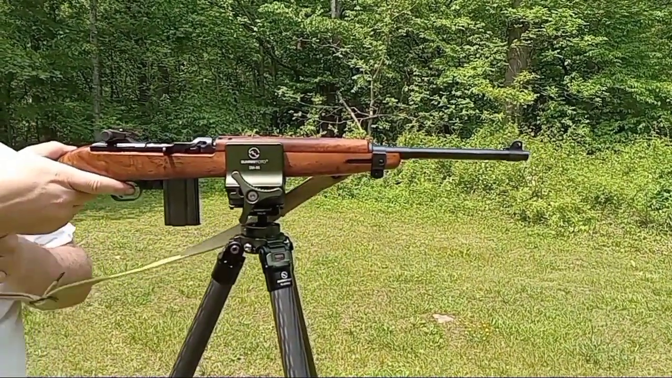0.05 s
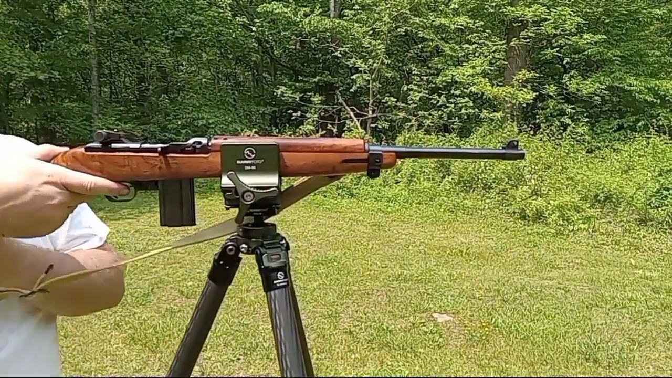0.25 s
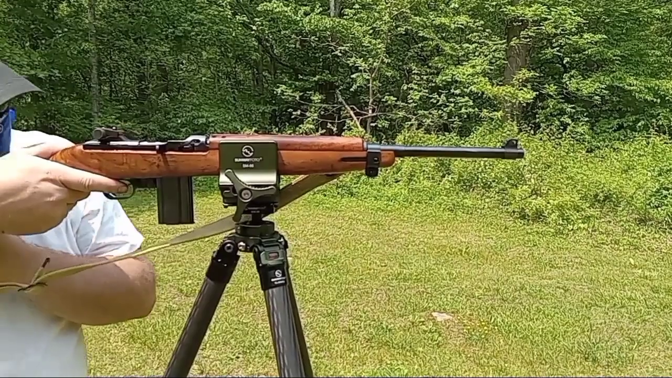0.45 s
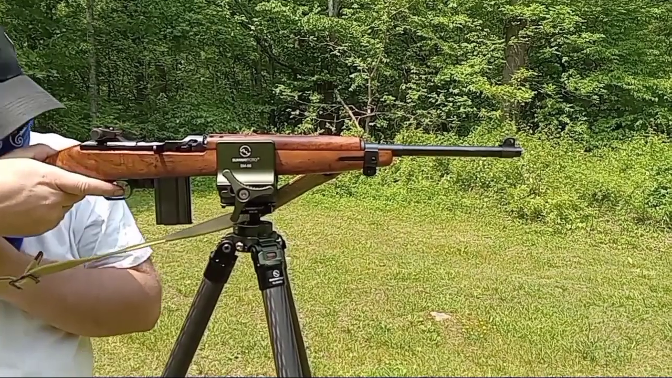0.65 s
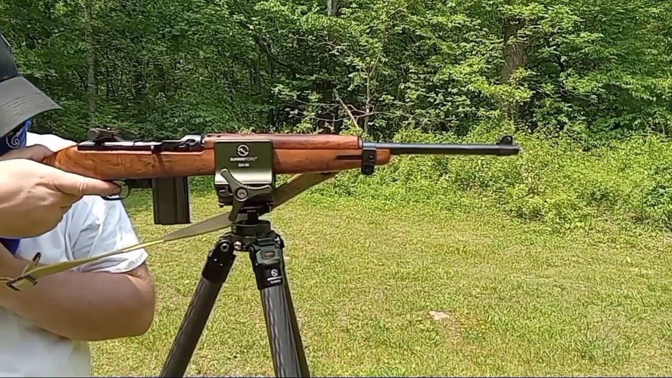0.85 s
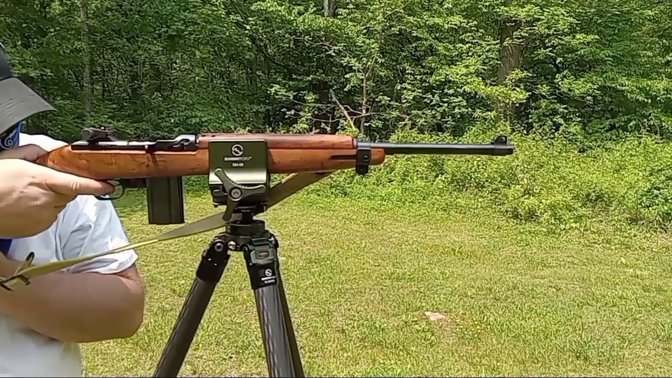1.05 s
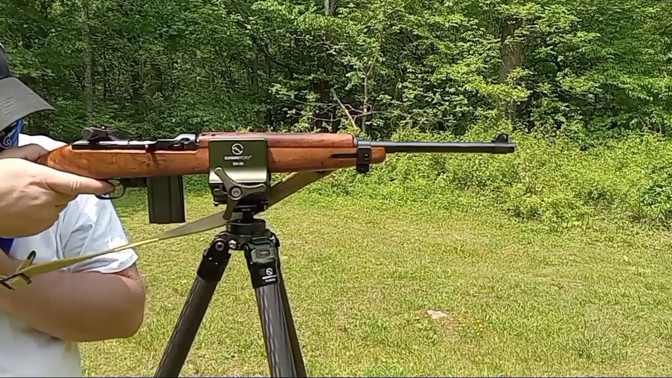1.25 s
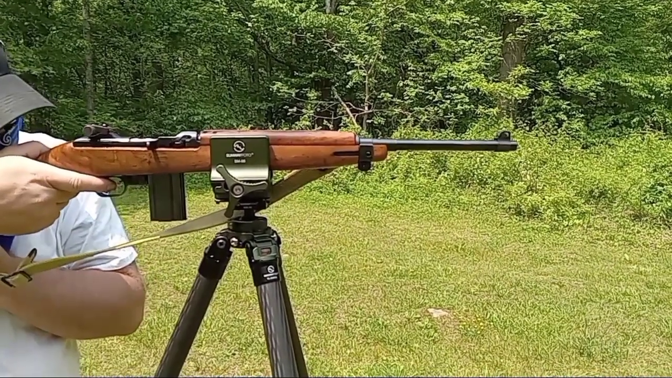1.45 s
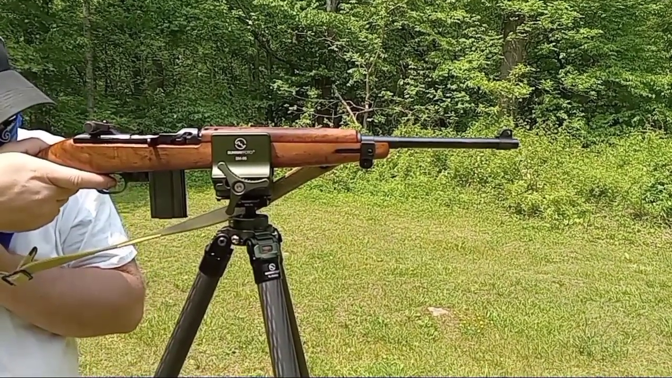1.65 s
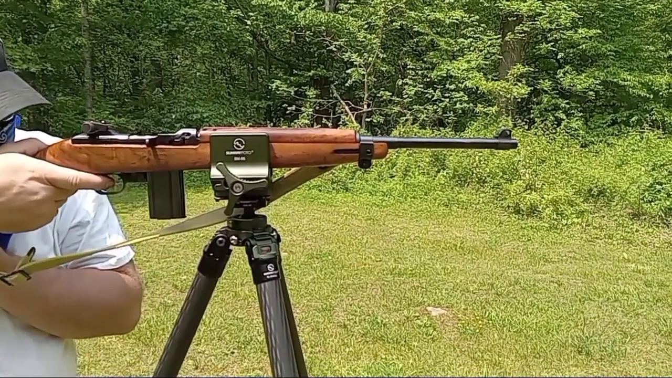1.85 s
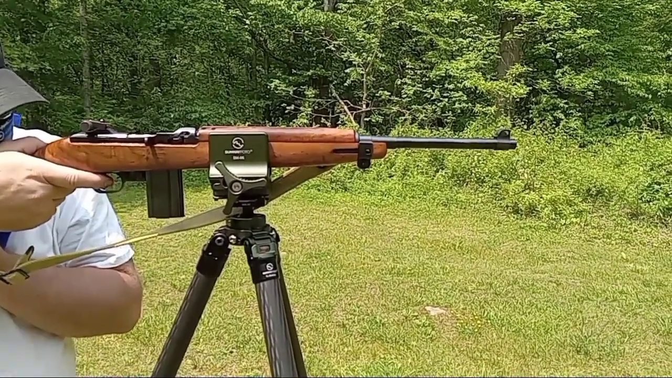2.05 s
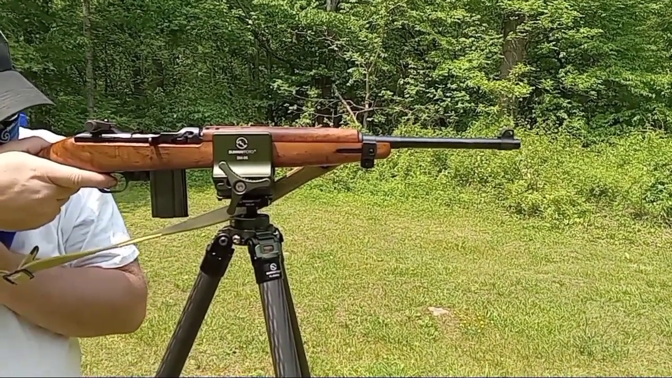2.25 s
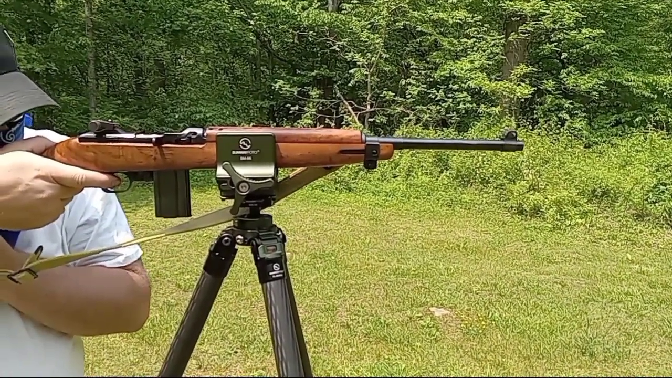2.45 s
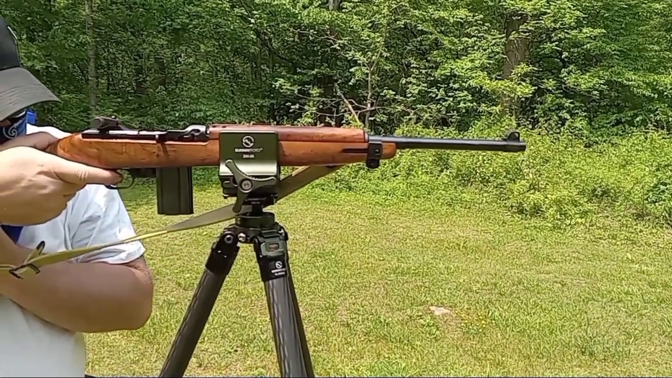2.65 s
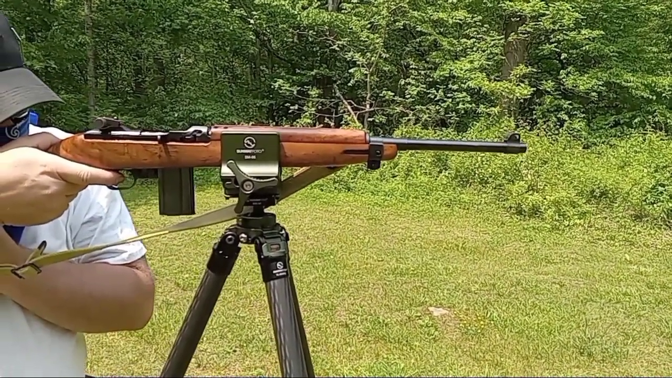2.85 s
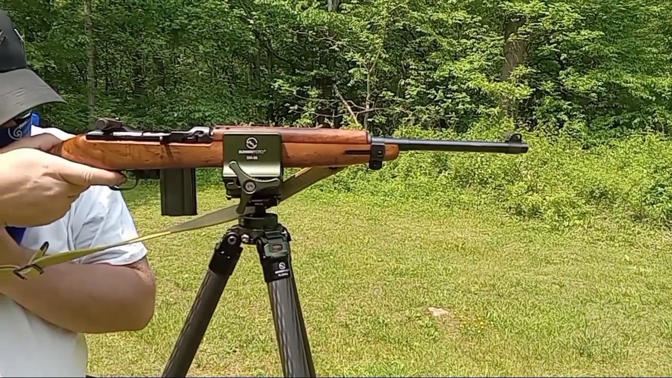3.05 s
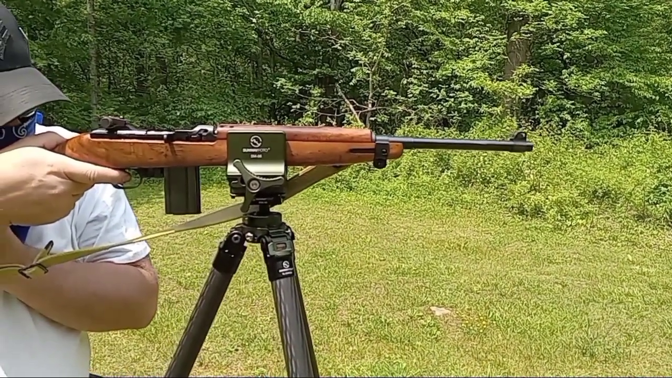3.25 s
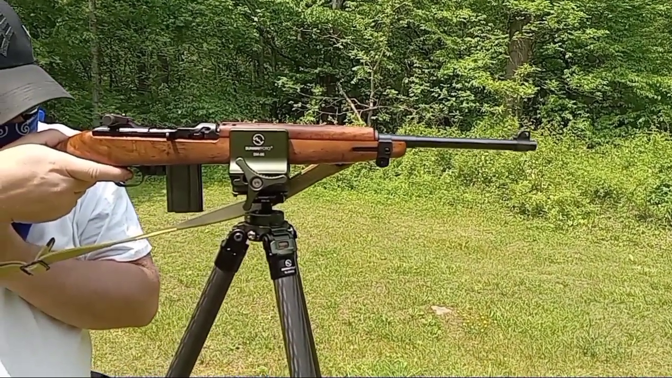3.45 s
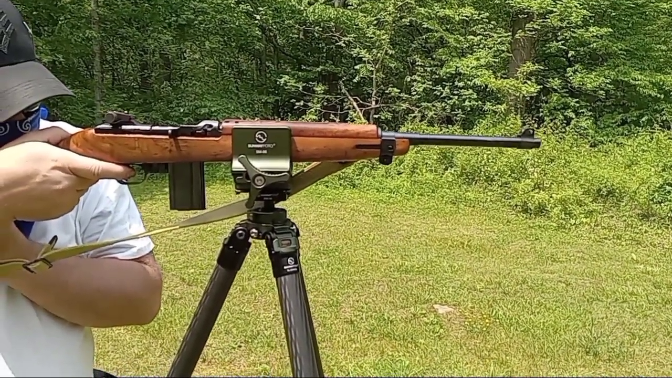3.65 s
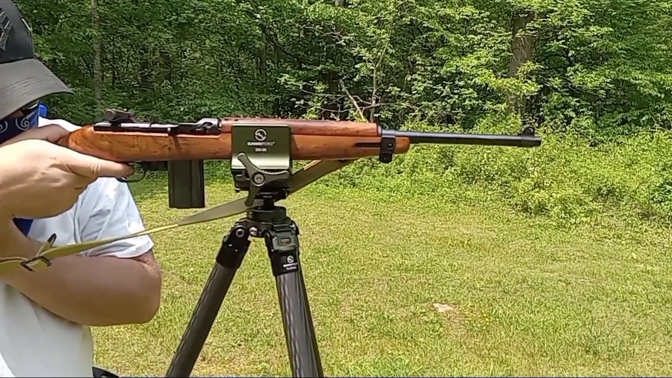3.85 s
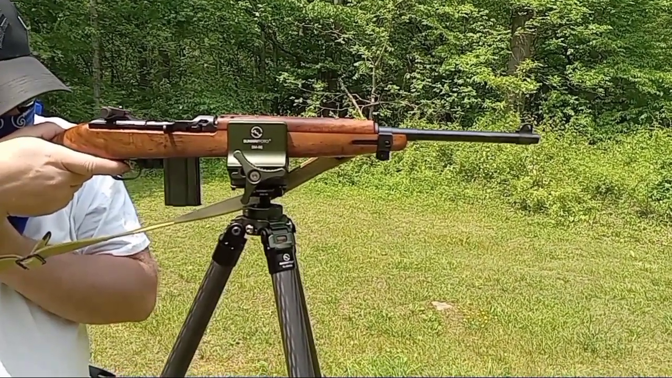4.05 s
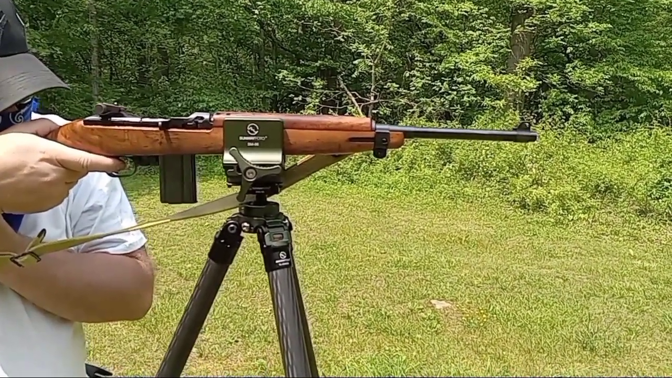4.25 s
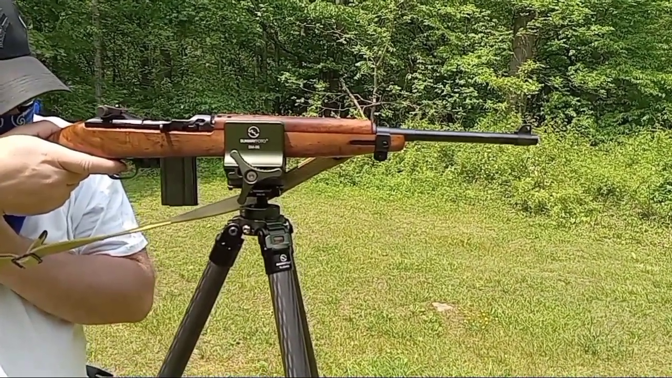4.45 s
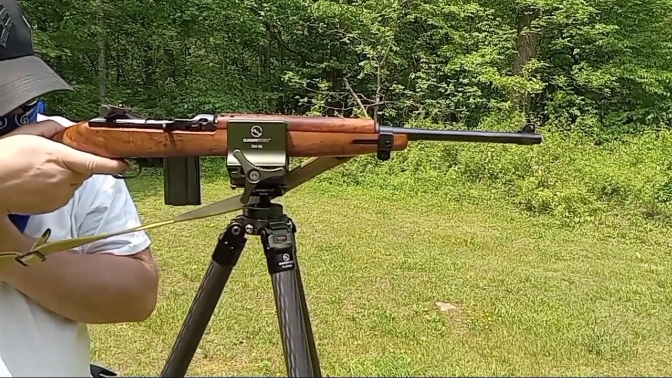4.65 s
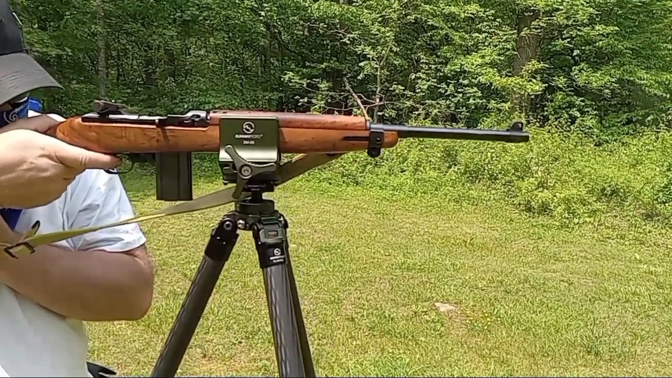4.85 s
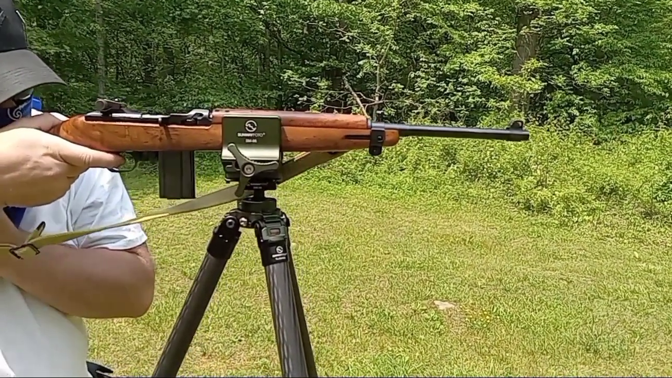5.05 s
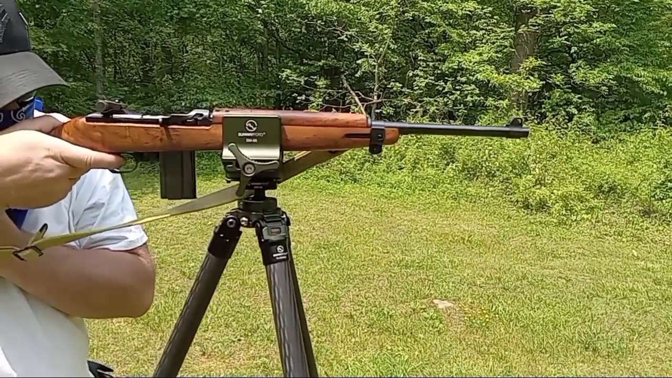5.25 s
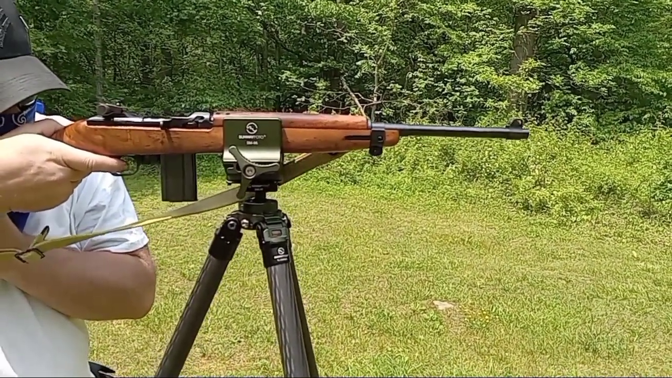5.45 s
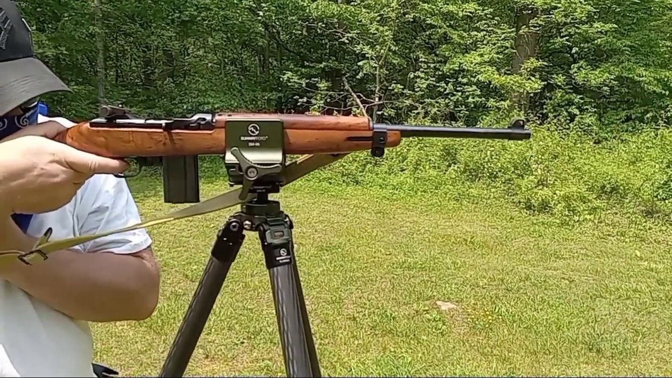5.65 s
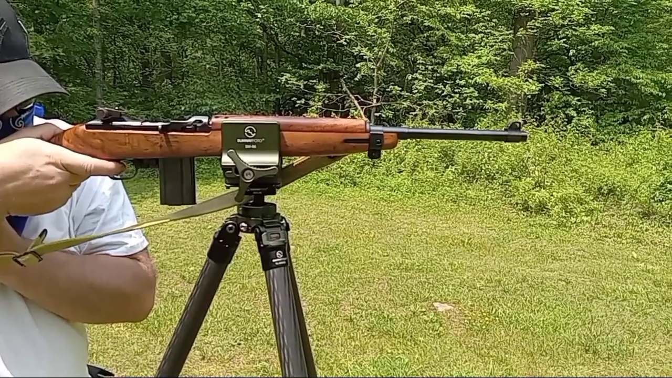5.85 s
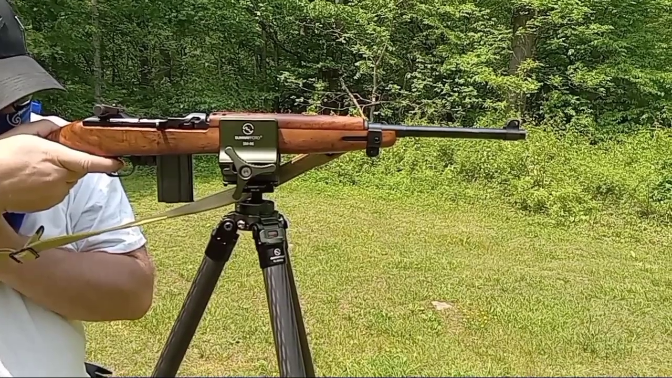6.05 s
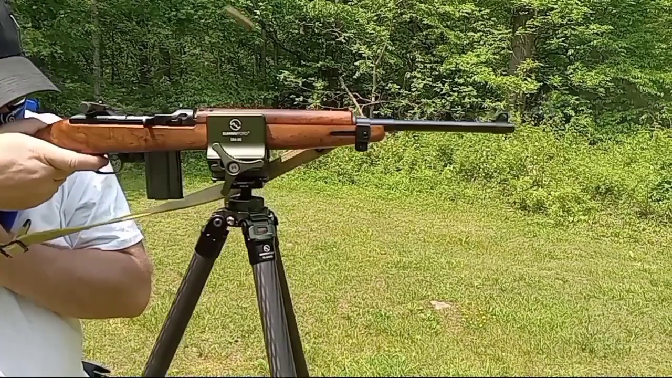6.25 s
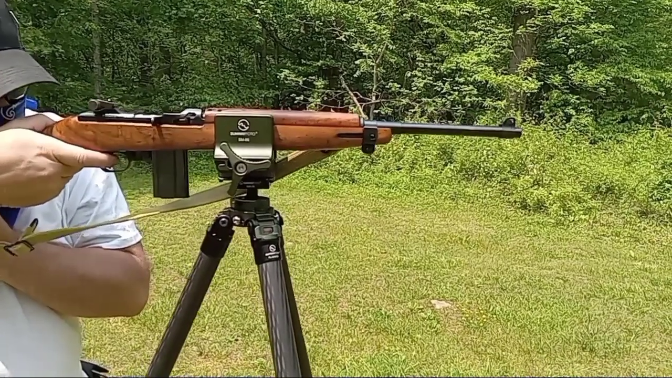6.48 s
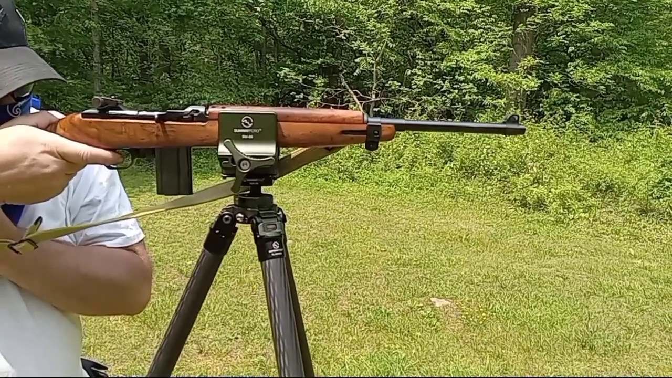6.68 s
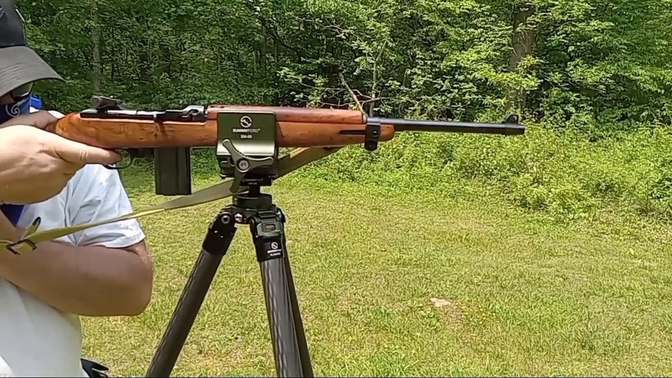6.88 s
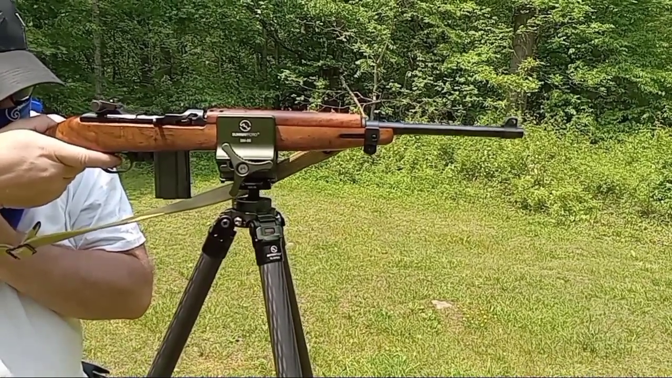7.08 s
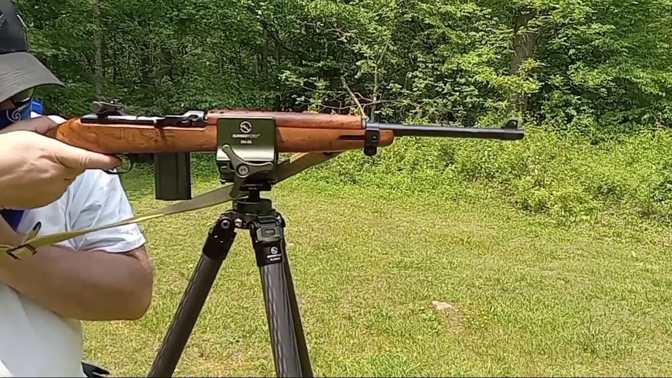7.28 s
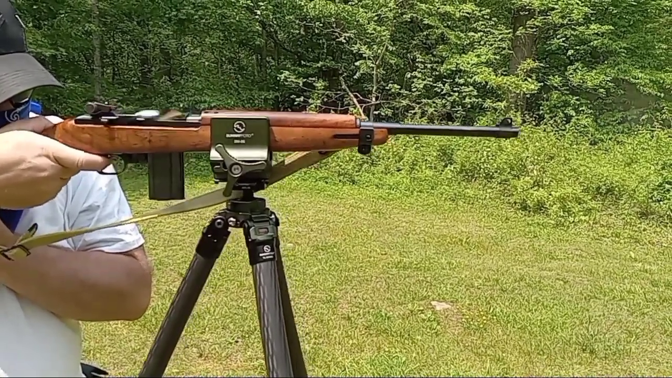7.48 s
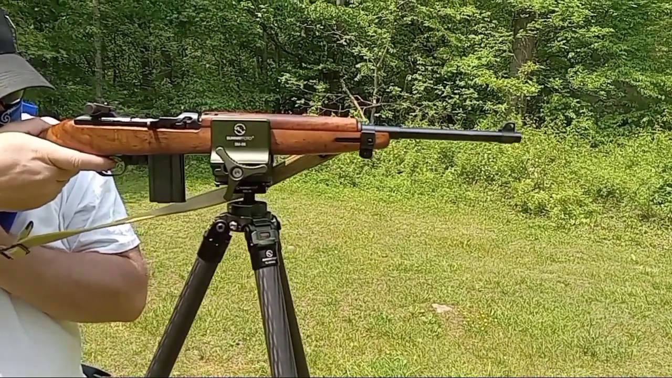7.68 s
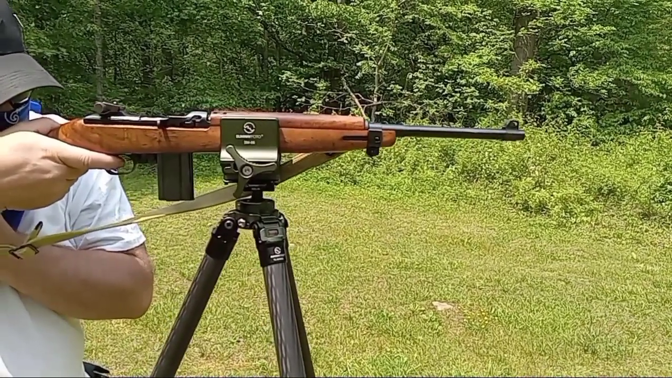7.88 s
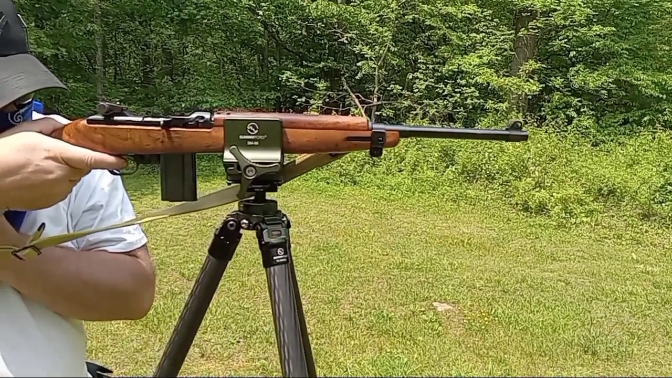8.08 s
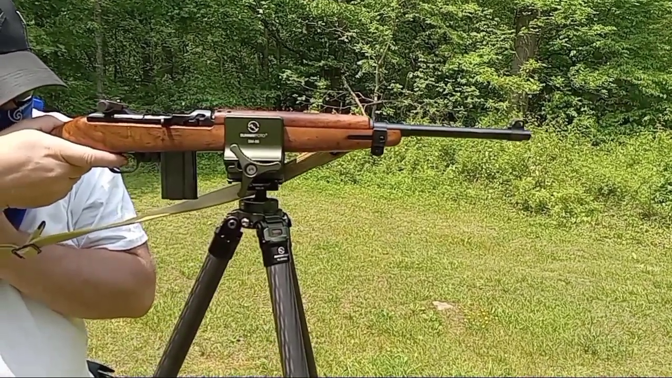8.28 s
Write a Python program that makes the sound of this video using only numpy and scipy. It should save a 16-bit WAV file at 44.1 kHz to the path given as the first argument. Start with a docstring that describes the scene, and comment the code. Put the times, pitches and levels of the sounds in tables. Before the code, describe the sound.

Very quiet opening: thin insect drone, far whistles and trills, uneven soft thuds of wind on the microphone, strongest around three and a half seconds. A carbine then fires three times at intervals of roughly a second and a half. Each blast is abrupt and clipped, followed by quick slap echoes, a short ring of the action and a wide hissing roll through the trees, darkening as it fades.

```python
"""A meadow ringed by woods: a carbine on a tripod fires three shots, a few metres from a small camera.
The hammer ticks (ringing modes plus scrape); the blast overloads the microphone (tanh); banks and trunks
throw it back as shaped noise bands and short slaps, the gun's action rings (short wavelets); a spent case
pings (decaying sines). Cicadas drone (flickering bands of hiss), birds whistle and trill far off (gliding,
warbled sines with a noise smear), puffs of wind thump on the microphone (low swings at uneven moments)."""
import sys
import numpy as np
from scipy import signal
from scipy.io import wavfile
from scipy.ndimage import uniform_filter1d

SR = 44100
rng = np.random.default_rng(int(sys.argv[2]) if len(sys.argv) > 2 else 0)


def persist_wave(psi):
    """Save psi, clipped to +-1, as 16-bit WAV."""
    counts = np.round(np.clip(psi, -1, 1) * 32767).astype(np.int16)
    wavfile.write(sys.argv[1], SR, np.atleast_2d(counts).T)


N = 366912

BANDS_HZ = 45 * 2 ** np.arange(0, 8.55, 1 / 3)  # third-octave centres of the echo roll


def undb(db):
    """Gain of a level in dB."""
    return 10 ** (np.asarray(db) / 20)


def band(x, hz, octaves=1 / 3):
    """Band-pass; unit white noise comes out at 0 dB per Hz."""
    edges_hz = np.minimum(hz * 2. ** np.array([-octaves / 2, octaves / 2]), .49 * SR)
    sos = signal.butter(2, edges_hz, "bandpass", fs=SR, output="sos")
    return signal.sosfilt(sos, x) * np.sqrt(SR / 2)


def walk(rate_hz, size=N):
    """Random levels held 1 / rate_hz and slewed by two moving averages."""
    k = int(SR / rate_hz)
    steps = np.repeat(rng.standard_normal(size // k + 1), k)
    return 1.3 * uniform_filter1d(uniform_filter1d(steps, k), k)[:size]


def add(out, s, x):
    """Mixes x into out from time s on."""
    i = int(s * SR)
    out[i:i + len(x)] += x[:len(out) - i]


def ring(modes, rise_s):
    """Struck metal: decaying sines of random phase behind a soft onset."""
    t = np.arange(SR // 5) / SR
    tone = 0
    for hz, db, t60_s in modes:
        tone = tone + undb(db - 60 * t / t60_s) * np.sin(2 * np.pi * (hz * t + rng.random()))
    return tone * (1 - np.exp(-t / rise_s))


def wavelet(s, hz, cycles, db):
    """Short pressure swing centred on time s, as (start s, samples)."""
    turns = np.arange(-2 * cycles, 2 * cycles, hz / SR)
    envelope = np.exp(-(2 * turns / cycles) ** 2)
    return s + turns[0] / hz, -undb(db) * envelope * np.sin(2 * np.pi * turns + 0.43)


def cicadas():
    """A far chorus: narrow bands of hiss, each flickering alone."""
    # spectrum before the whole is levelled: (frequency [Hz], relative density [dB per Hz])
    spectrum = [(82, -35), (140, -13), (393, -14.5), (1060, -10.5), (1370, 0), (2500, -8.5), (3210, -3.5),
                (4410, -17), (6430, -21.5), (8150, -29), (9750, -33), (11200, -44.5), (16000, -41.5)]
    level_db = -60
    hz_at, db_at = np.transpose(spectrum)
    out = 0
    for hz in 110 * 2 ** np.arange(0, 7.2, 1 / 5):
        db = np.interp(np.log(hz), np.log(hz_at), db_at) + 0.8 * walk(36)
        out = out + undb(db) * band(rng.standard_normal(N), hz, 1 / 5)
    return out / out.std() * undb(level_db)


def birds():
    """Gliding whistles, roughened by a fast warble, smeared by the woods."""
    # calls: (start [s], end [s], start frequency [Hz], end frequency [Hz], level [dB], buzz [0-1])
    calls = [(0.039, 0.135, 3460, 3425, -60, 0.3), (0.097, 0.143, 3680, 3710, -57, 0.2),
             (.71, 0.738, 2820, 2820, -64, 0.1), (0.763, 0.814, 2500, 2700, -64, 0.05),
             (0.867, 0.932, 3300, 3270, -61, 0.25), (1.387, 1.422, 2901, 2950, -64, 0.16),
             (1.4, 1.486, 5800, 5800, -77, 0.07), (1.583, 1.69, 4930, 4920, -72, 0),
             (1.67, 1.771, 3780, 3802, -67, 0), (1.71, 1.86, 5330, 5400, -74.5, 0),
             (1.91, 1.98, 4740, 4720, -70, 0.1), (1.924, 1.985, 3110, 2940, -61, 0.44),
             (2.02, 2.175, 5250, 5360, -62, 0.1), (2.126, 2.164, 2930, 3080, -57.5, 0.15),
             (2.153, 2.214, 4860, 3420, -65.5, 0.05), (2.31, 2.367, 4230, 4800, -68, 0.03),
             (2.362, 2.4, 4810, 4860, -62.5, 0.03), (2.442, 2.547, 4700, 2700, -62, 0.07),
             (2.478, 2.545, 3850, 3570, -63.5, 0.03), (2.6, 2.648, 3763, 5200, -66, 0.05),
             (2.634, 2.687, 5320, 5070, -65, 0.2), (2.662, 2.739, 4500, 2950, -58.5, 0.17),
             (2.672, 2.72, 4600, 4630, -69, .03), (2.833, 2.919, 4460, 2720, -57, 0.08),
             (2.848, 2.906, 4800, 4710, -68, 0.1), (2.91, 2.959, 3220, 5370, -65, 0.05),
             (3.046, 3.128, 4570, 4580, -59.5, 0.1), (3.145, 3.325, 3900, 3780, -58, 0.25),
             (3.192, 3.26, 4390, 3390, -57, 0.13), (3.302, 3.36, 4470, 4450, -54.5, 0.04),
             (3.297, 3.331, 2758, 3440, -53, 0.1), (3.396, 3.517, 5580, 5480, -62, 0.8),
             (3.443, 3.509, 6000, 7390, -69, 0.4), (3.53, 3.675, 5680, 5630, -67.5, .4),
             (3.549, 3.622, 4920, 3300, -58.5, 0.05), (3.585, 3.644, 3980, 3830, -59.5, 0.13),
             (4.287, 4.357, 2950, 2867, -59.5, 0.46), (4.462, 4.493, 5605, 5450, -60.5, 0.07)]
    warble_hz, smear_t60_s, smear_db = 393, 0.5, -1.5
    out = np.zeros(N)
    for start, end, from_hz, to_hz, db, buzz in calls:
        u = np.linspace(0, 1, int((end - start) * SR))
        glide_hz = from_hz * (to_hz / from_hz) ** u ** 0.92
        jitter = (.009 + .012 * buzz) * walk(700, len(u))
        warble = .11 * buzz * np.sin(2 * np.pi * warble_hz * (end - start) * u)
        hz = glide_hz * (1 + jitter + warble)
        swell = undb(db + 3.2 * walk(90, len(u))) * np.sin(np.pi * u) ** (0.58 - 0.5 * buzz)
        add(out, start, np.sqrt(2) * swell * np.sin(2 * np.pi * np.cumsum(hz) / SR))
    t = np.arange(SR // 2) / SR
    smear = rng.standard_normal(len(t)) * undb(-60 * t / smear_t60_s)
    smear = smear / np.sqrt(np.sum(smear ** 2))
    return out + undb(smear_db) * signal.fftconvolve(out, smear)[:N]


def wind_push():
    """Strength of the wind: a faint floor, spells of breeze, puffs strongest towards the front."""
    # spells of light wind: (start [s], end [s], level [dB])
    breeze = [(0, 0.375, -72), (0.747, 1.802, -73), (2.124, 2.461, -65.5), (2.665, 3.118, -69.5),
              (3.37, 3.935, -61.5), (4.064, 4.606, -64), (6.516, 6.987, -53)]
    # puffs: (start [s], level [dB], length [s], stretched to 0.02 if shorter)
    puffs = [(0.327, -44, 0.051), (1.136, -33.5, 0.082), (1.48, -49, 0.1), (1.581, -39, 0.0617),
             (1.643, -39, 0.0543), (1.718, -48, 0.0975), (2.161, -48.5, 0.0315), (2.893, -45, 0.025),
             (3.054, -35.5, 0.0916), (3.357, -40.5, 0.053), (3.543, -23, 0.079), (3.669, -33, 0.099),
             (4.089, -47, 0.0185), (4.314, -38, 0.022)]
    push = undb(-78.0 + 5.9 * walk(28))  # the air is never quite still
    for start, end, db in breeze:
        add(push, start, undb(db + 3.49 * walk(21.81, int((end - start) * SR))))
    for s, db, length_s in puffs:
        u = np.linspace(0, 1, int(max(length_s, .02) * SR))
        add(push, s, undb(db - 16.0 * u) * np.sin(np.pi * u) ** 0.74)
    return push


def wind():
    """Eddies knock the membrane at uneven moments: band-passed impulses of alternating sign."""
    push = wind_push()
    count = N // 200
    when = np.cumsum(rng.uniform(0.0035, 0.01, count) * SR).astype(int)
    size = (-1.) ** np.arange(count) * undb(4 * rng.standard_normal(count))
    eddies = np.zeros(N)
    eddies[when[when < N]] = size[when < N]
    eddies = signal.sosfilt(signal.butter(2, [50, 140], "bandpass", fs=SR, output="sos"), eddies)
    return signal.sosfilt(signal.butter(5, 200, fs=SR, output="sos"), push * eddies / eddies.std())


def spent_case():
    """One case pings on something hard: two decaying modes."""
    # modes: (frequency [Hz], level [dB], t60 [s])
    case_modes = [(10750, -48, 0.088), (15750, -63, .06)]
    out = np.zeros(N)
    add(out, 5.287, ring(case_modes, rise_s=0.00103))
    return out


def late_echoes():
    """Details late in the rolls: narrow noise swells, and lone trunks answering sharply in the last one."""
    # swells, low booms and bright patches: (start [s], centre [Hz], length [s], level [dB])
    booms = [(4.96, 1900, .12, -32), (5.138, 1400, 0.064, -29.5), (5.245, 465, 0.054, -35),
             (5.347, 630, 0.062, -38), (5.477, 419, 0.08, -42), (5.593, 413, 0.061, -39.5),
             (6.355, 2360, 0.097, -26.5), (6.714, 410, 0.0615, -39), (7.693, 2070, .11, -29.5),
             (7.832, 2830, 0.052, -27)]
    # lone trunks: (time [s], level [dB])
    cracks = [(7.729, -8), (7.764, -8), (7.817, -12)]
    out = np.zeros(N)
    for s, hz, length_s, db in booms:
        rumble = band(rng.standard_normal(SR // 4), hz, 0.28)[-int(length_s * SR):]
        add(out, s, undb(db) * rumble / rumble.std() * np.sin(np.linspace(0, np.pi, len(rumble))))
    for s, db in cracks:
        add(out, *wavelet(s, 2434, 1.713, db))
    return out


def hammer(db):
    """Hammer tick: ringing modes with a rough level, plus a short scrape of differenced noise."""
    # modes: (frequency [Hz], relative level [dB], t60 [s])
    hammer_modes = [(6450, 10, 0.016), (9393, 0.5, 0.013), (15410, -10, .02)]
    tick = ring(hammer_modes, rise_s=0.0014)
    t = np.arange(len(tick)) / SR
    scrape = rng.standard_normal(len(t)) * undb(-4.0 - 60 * t / 0.034)
    return undb(db) * (tick * undb(7.0 * walk(1500, len(t))) + np.diff(scrape, prepend=0))


def trunks(size, spread_db):
    """Countless small reflections, a few much stronger than the rest."""
    x = rng.standard_normal(size) * undb(spread_db * np.minimum(rng.exponential(size=size), 5))
    return x / x.std()


def registers(t, edge_hold_s, bass_s, treble_s, over_s, treble_drop_db):
    """Levels of bass, middle and treble: every arrival rises, holds and falls; then the roll turns thin."""
    # blast, meadow, near bank, far bank, lone stand, deep wood: (after the blast [s], rise [s],
    # hold [s], fall of the middle [dB/s], bass [dB], middle [dB], treble [dB])
    arrivals = [(0, .0015, 0.0261, 699, -21, -16, -22), (0, 0.016, 0.026, 39.5, -32.5, -25, -28),
                (0.045, 0.0101, 0.012, 904, -37, -23, -23.5), (0.087, 0.02, 0.0048, 59, -29.5, -20, -34),
                (.178, 0.00606, .004, 503.5, -48, -49, -91), (0.54, 0.14, 0.075, 20, -35.5, -33, -55)]
    # edge of the wood, its hold set per shot: (after the blast [s], rise [s],
    # fall of the middle [dB/s], bass [dB], middle [dB], treble [dB])
    edge = (.22, 0.19, 27.5, -33, -21, -41.5)
    pace = np.array([[0.59], [1], [1.69]])  # fall of bass, middle, treble against the middle
    bass_drop_db, middle_share = -8, 0.23  # the middle drops with the treble, by this share of it
    power = 0
    for s, rise_s, hold_s, fall_db_s, *db in [*arrivals, (*edge[:2], edge_hold_s, *edge[2:])]:
        swell = np.sin(np.pi / 2 * np.clip((t - s) / rise_s, 0, 1)) ** 2
        late_s = np.maximum(t - s - rise_s - hold_s, 0)
        power = power + swell * undb(2 * (np.array(db)[:, None] - pace * fall_db_s * late_s))
    thin = np.clip((t - np.array([[bass_s], [treble_s], [treble_s]])) / over_s, 0, 1)
    drop_db = np.array([[bass_drop_db], [middle_share * treble_drop_db], [treble_drop_db]])
    return 10 * np.log10(power + 1e-14) + thin * drop_db


def roar(thinning, same):
    """Blast and echo roll; the bass meets the same trees every shot, the treble scatters anew off leaves."""
    # colour: (frequency [Hz], density [dB per Hz], share of bass level [-], share of treble level [-])
    colour = [(49, -7.5, 1.576, 0), (136.3, 6, 0.39, 0.5), (298, -0.5, 1.01, 0), (660, 2.5, 1.16, 0),
              (1130, 0, 0.85, 0), (1330, 2.5, 0.25, 0), (2070, -3.5, 0.054, 0.03), (3050, -2.5, 0, 0.164),
              (5536, -1.74, 0, 0.7744), (6373, 5, 0, 0.51), (8500, -3.5, 0.044, 1.76),
              (10150, -3, 0.13, 0.75), (12000, -12.5, 0.6, 2), (13500, -21.5, 0.15, 2.96),
              (15500, -13, 0.59, 1)]
    roll_s = 1.5
    # the strongest region of the roll sinks as the paths grow longer
    crest_from_hz, crest_to_hz, crest_sink_s, crest_octaves, crest_db = 4170, 1410, 0.79, 0.39, 2.5
    t = np.arange(1, int(roll_s * SR)) / SR
    low_db, level_db, high_db = registers(t, *thinning)
    bass_db, treble_db = low_db - level_db, high_db - level_db
    per_hz_db = level_db - 35  # the level is spread over the wide middle band
    crest_hz = crest_to_hz * (crest_from_hz / crest_to_hz) ** np.exp(-t / crest_sink_s)
    hz_at, *shape = np.transpose(colour)
    leaves = trunks(len(t) + SR // 8, 3.0)
    clump = walk(28, len(t))
    out = 0
    for k, (hz, trees) in enumerate(zip(BANDS_HZ, same)):
        db, bass, treble = (np.interp(np.log(hz), np.log(hz_at), c) for c in shape)
        # share of the fixed trees: grows over 0.07 s, less in the treble
        share = np.clip(t / .07, 0, 1) / (1 + (hz / 1500) ** 2)
        echo = np.sqrt(share) * trees[:len(t)] + np.sqrt(1 - share) * band(leaves, hz)[SR // 8:]
        # stands of trees answer in clumps: patches of level shared by neighbouring bands
        clump = .5 * clump + .87 * walk(28, len(t))
        patchy_db = np.clip(t / .3, 0, 1) * np.exp(-t) * (2.2 + 1.4 * bass) * clump
        db = db + crest_db * np.exp(-(np.log2(hz / crest_hz) / crest_octaves) ** 2)
        band_db = per_hz_db + db + bass * bass_db + treble * treble_db + patchy_db
        # neighbouring bands meet in opposite phase, so every other one is turned over
        out = out + (-1) ** k * echo * undb(band_db)
    return out


def shots():
    """Three shots: hammer, blast with its echo roll, then short wavelets for slaps and the action's ring."""
    # shots: (blast [s], hammer level [dB], hold of the wood-edge echo [s], bass drops after [s],
    # treble drops after [s], both drop over [s], treble drop [dB])
    firings = [(4.541, -32, 0.19, 0.71, 0.59, 0.28, -20), (6.0139, -19.5, 0.1, 0.38, 0.464, 0.036, -9.5),
               (7.3255, -28, .09, .37, .47, .06, -9.5)]
    # short sounds after each blast: slaps off near trunks and banks, and a ring of the gun's action
    # at 3600 Hz: (after the blast [s], frequency [Hz], length [cycles], level [dB])
    short_sounds = [(.030, 391, 1.47, -9.5), (.067, 930, 1.5, -17), (.090, 1900, 1.9, -11),
                    (.104, 255, 2.1, -27), (.119, 847, 0.91, -7.5), (.126, 3600, 10, -15),
                    (.192, 1150, 1.9, -11.5)]
    hammer_lead_s = 0.0066
    out = np.zeros(N)
    wood = trunks(2 * SR, 3.2)
    same = [band(wood, hz)[SR // 4:] for hz in BANDS_HZ]
    for s, hammer_db, *thinning in firings:
        add(out, s - hammer_lead_s, hammer(hammer_db))
        add(out, s, roar(thinning, same))
        for delay_s, *swing in short_sounds:
            add(out, *wavelet(s + delay_s, *swing))
    return out


def scene():
    """Everything at one microphone."""
    return (cicadas() + birds() + wind() + spent_case() + late_echoes() + shots())[None]


def record(dry):
    """The microphone port colours the treble, tanh rounds off the blast, an elliptic low-pass cuts the top."""
    # port resonances: (frequency [Hz], width [Hz], level [dB])
    port = [(8013, 2010, -10), (9660, 470, 5.5), (15170, 1100, 6.5)]
    top_hz = 16000
    for hz, width_hz, db in port:
        dry = dry + (undb(db) - 1) * signal.lfilter(*signal.iirpeak(hz, hz / width_hz, SR), dry)
    rounded = 0.61 * np.tanh(dry / 0.59)
    return signal.sosfilt(signal.ellip(10, .2, 80, top_hz, fs=SR, output="sos"), rounded)


dry = scene()
out = record(dry)
persist_wave(out)
```